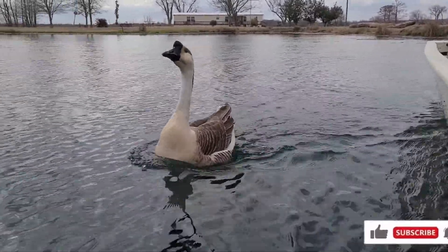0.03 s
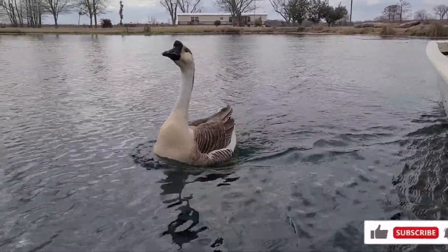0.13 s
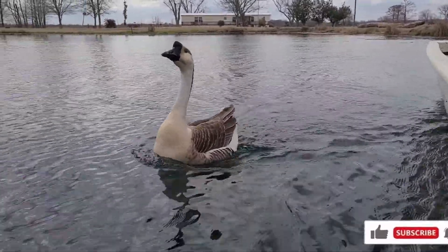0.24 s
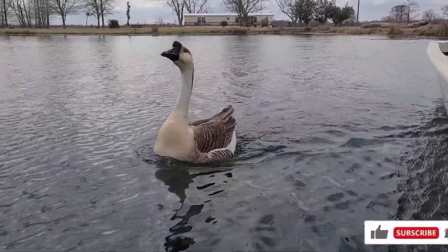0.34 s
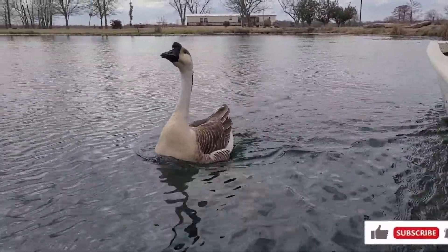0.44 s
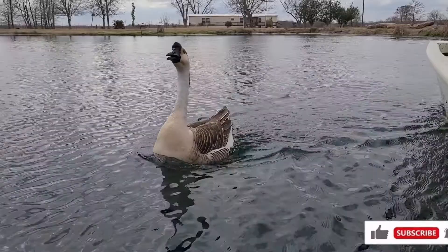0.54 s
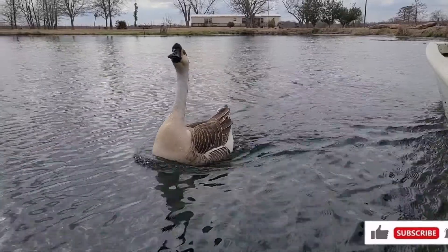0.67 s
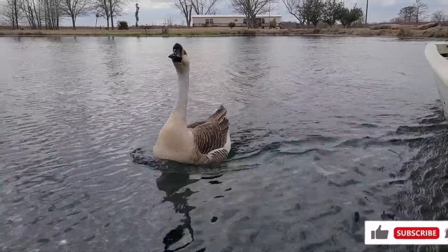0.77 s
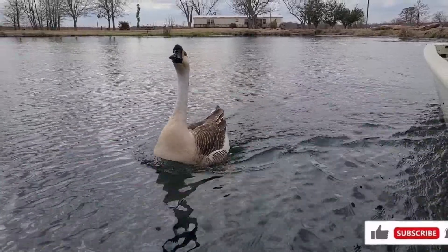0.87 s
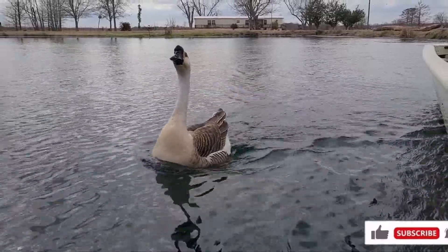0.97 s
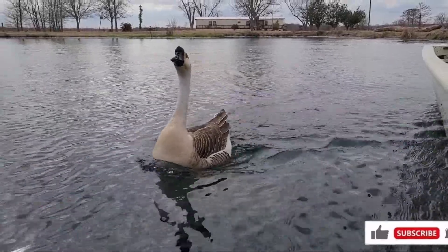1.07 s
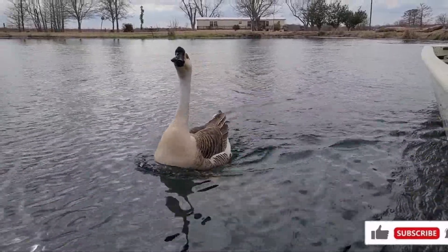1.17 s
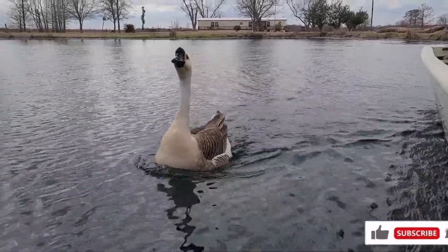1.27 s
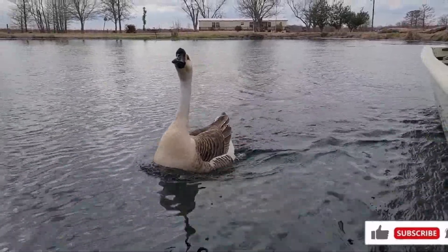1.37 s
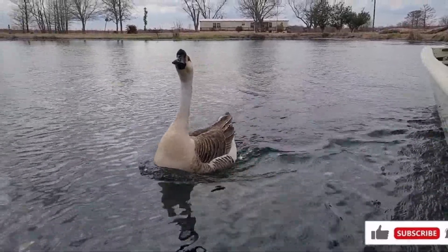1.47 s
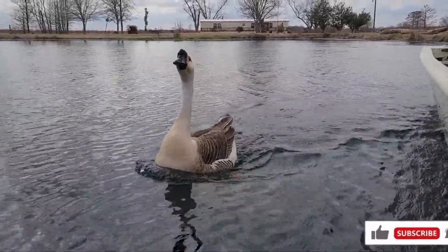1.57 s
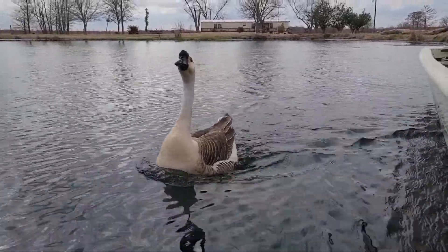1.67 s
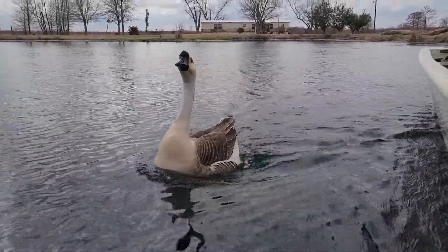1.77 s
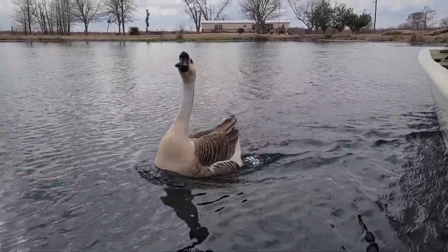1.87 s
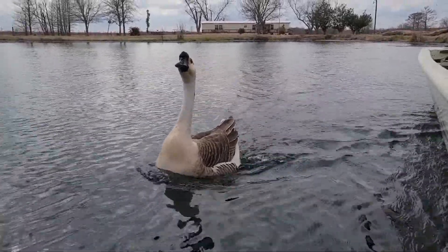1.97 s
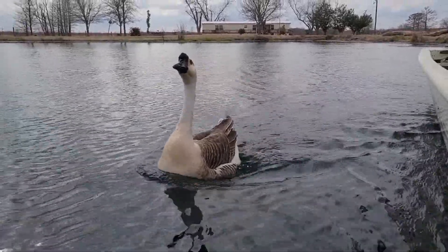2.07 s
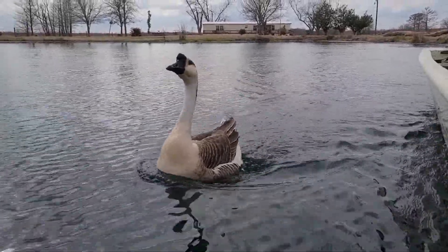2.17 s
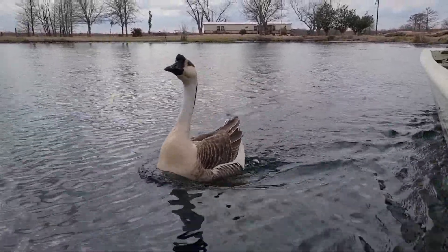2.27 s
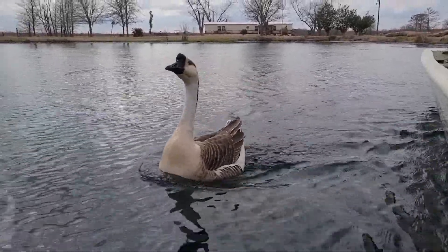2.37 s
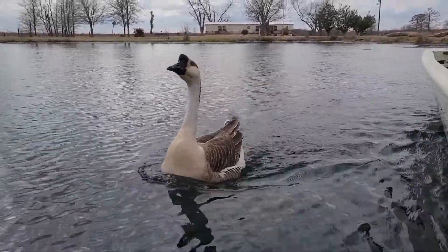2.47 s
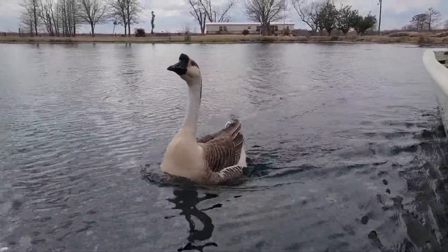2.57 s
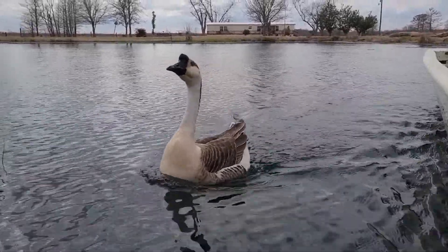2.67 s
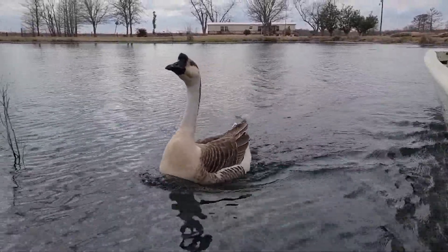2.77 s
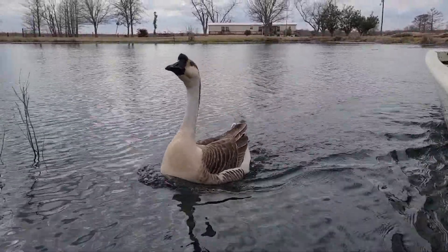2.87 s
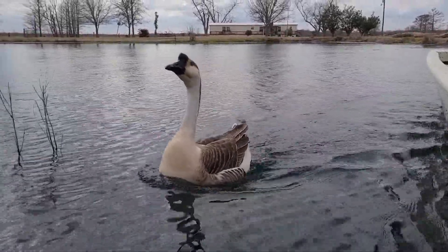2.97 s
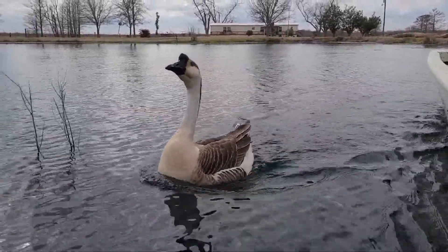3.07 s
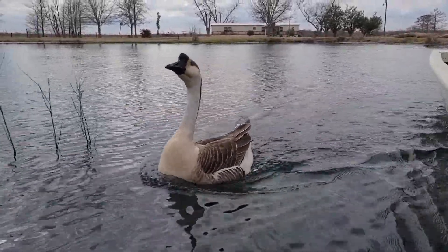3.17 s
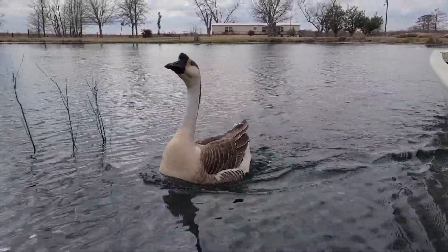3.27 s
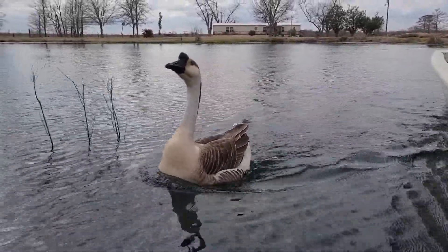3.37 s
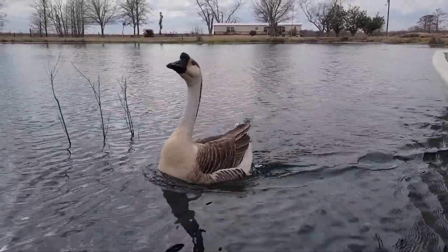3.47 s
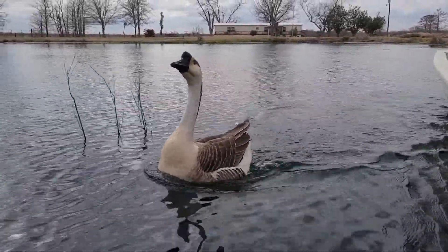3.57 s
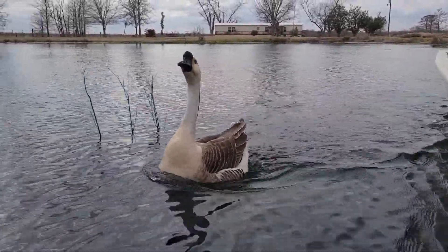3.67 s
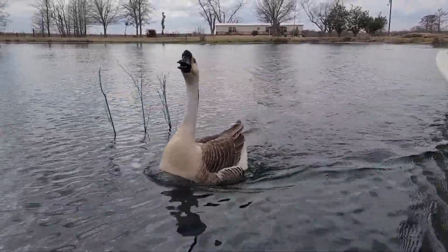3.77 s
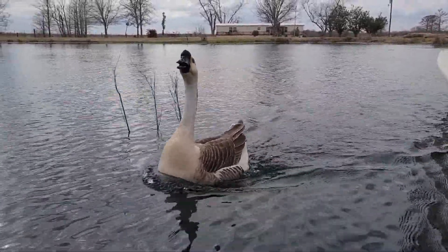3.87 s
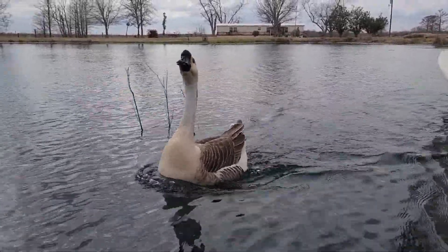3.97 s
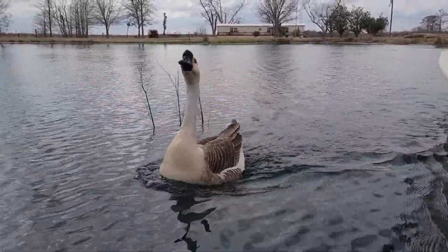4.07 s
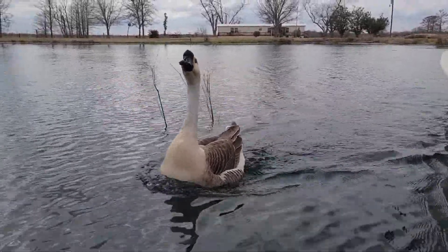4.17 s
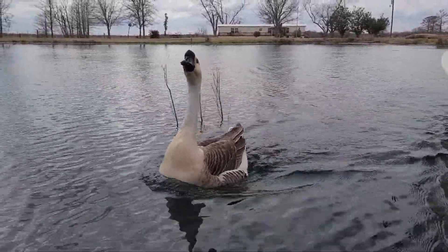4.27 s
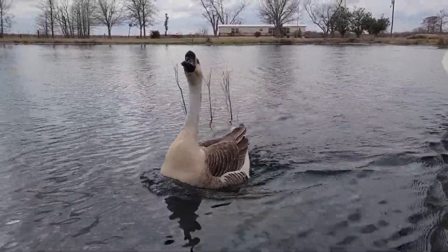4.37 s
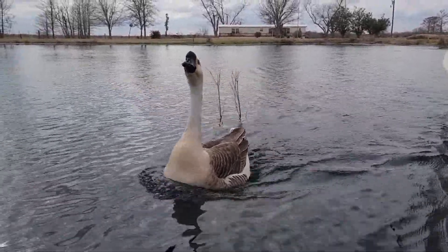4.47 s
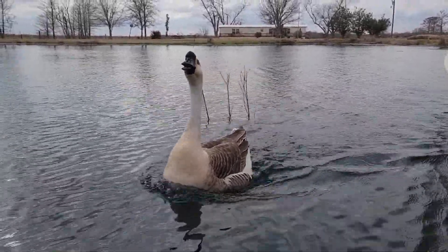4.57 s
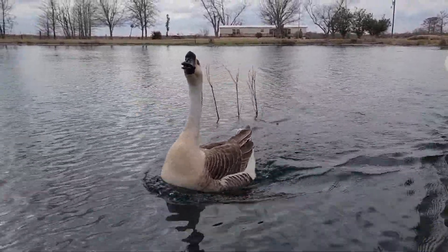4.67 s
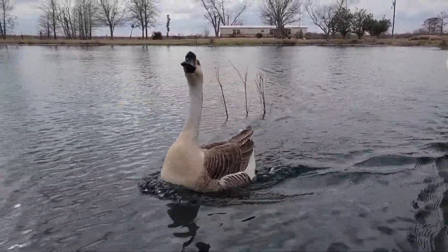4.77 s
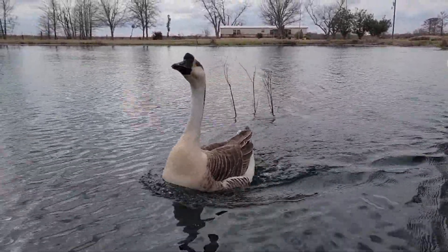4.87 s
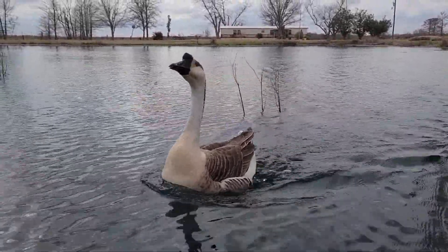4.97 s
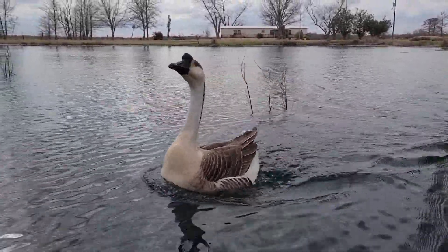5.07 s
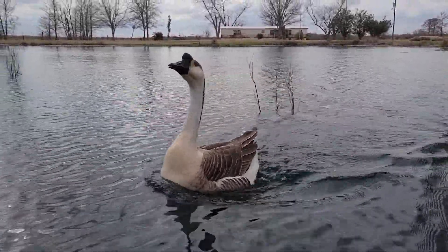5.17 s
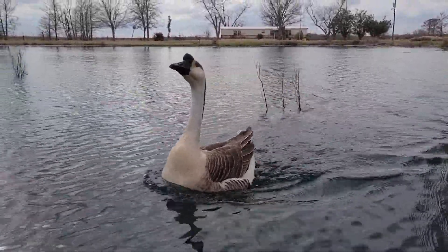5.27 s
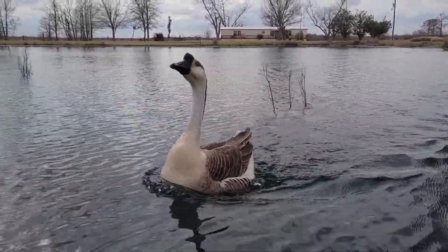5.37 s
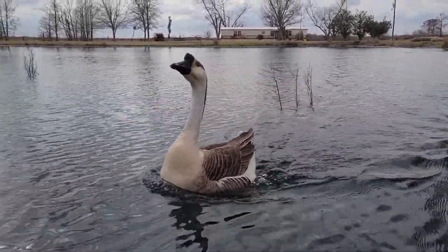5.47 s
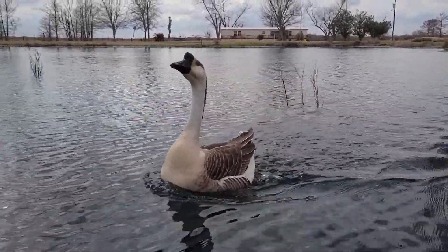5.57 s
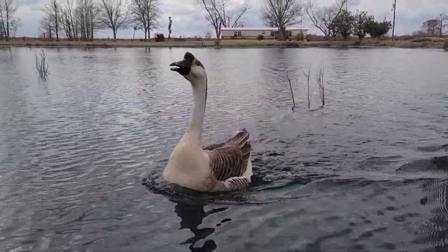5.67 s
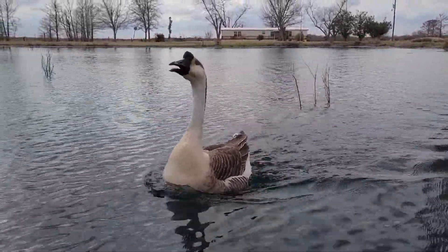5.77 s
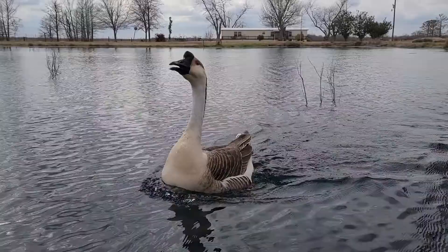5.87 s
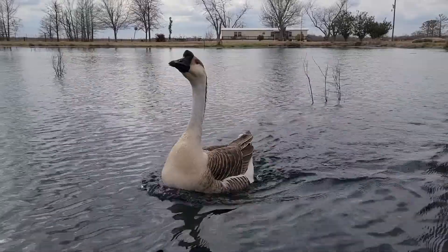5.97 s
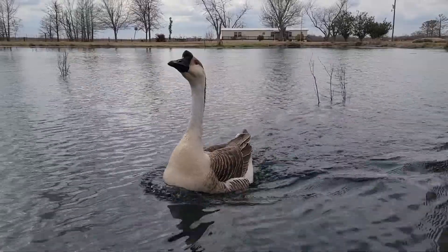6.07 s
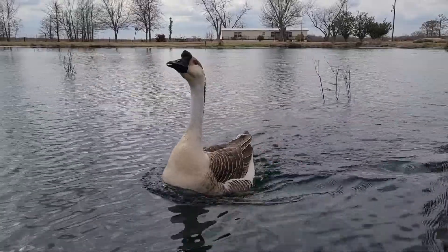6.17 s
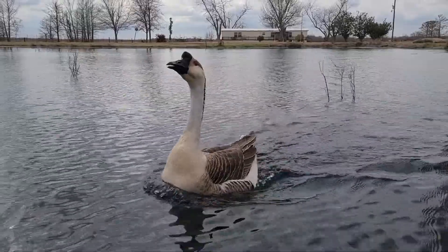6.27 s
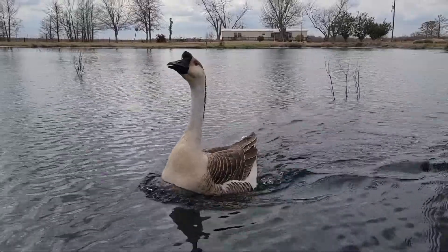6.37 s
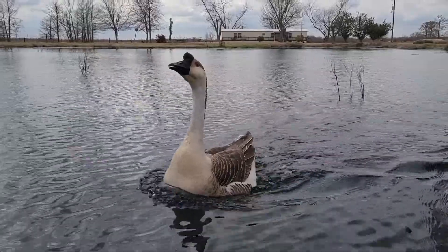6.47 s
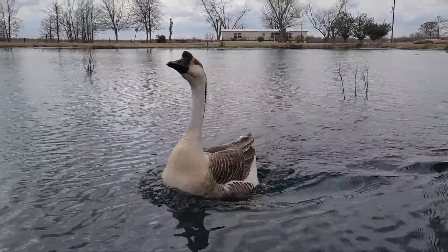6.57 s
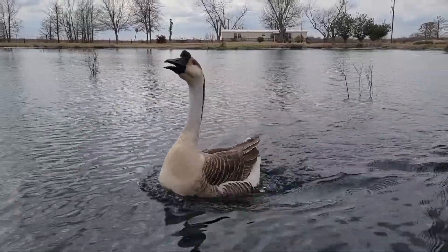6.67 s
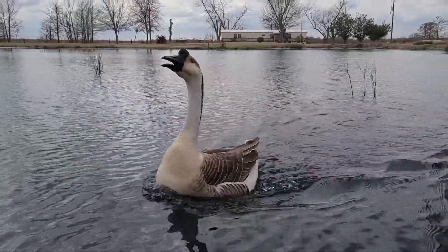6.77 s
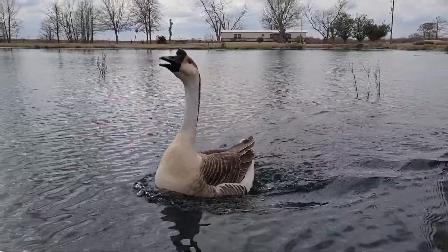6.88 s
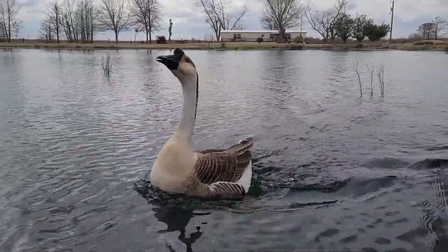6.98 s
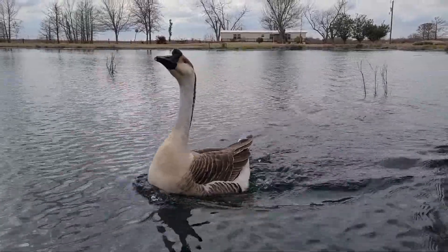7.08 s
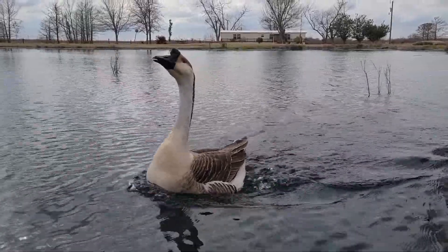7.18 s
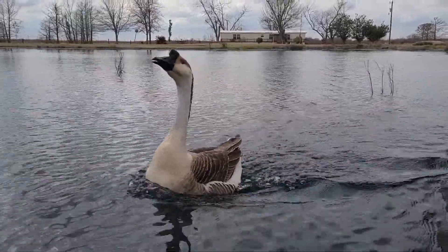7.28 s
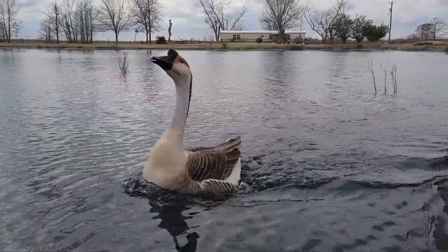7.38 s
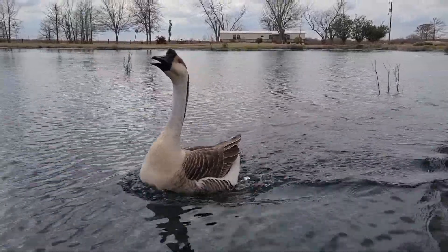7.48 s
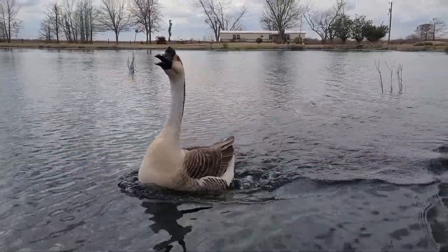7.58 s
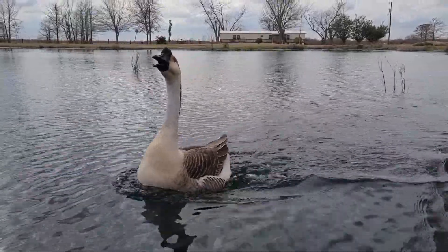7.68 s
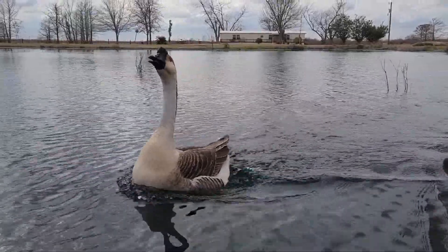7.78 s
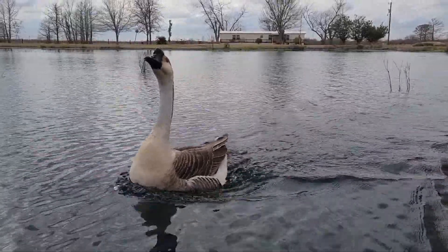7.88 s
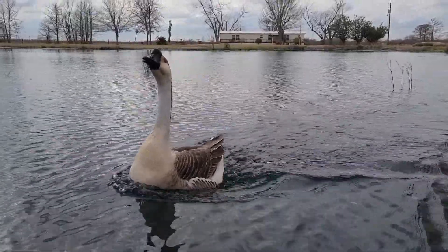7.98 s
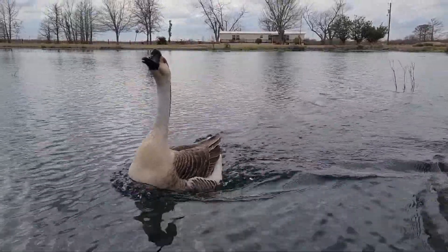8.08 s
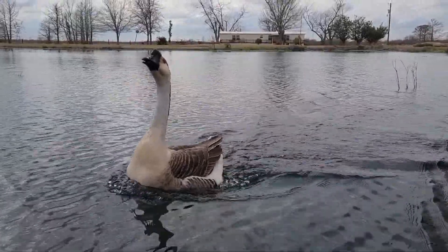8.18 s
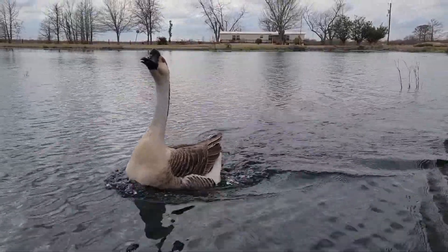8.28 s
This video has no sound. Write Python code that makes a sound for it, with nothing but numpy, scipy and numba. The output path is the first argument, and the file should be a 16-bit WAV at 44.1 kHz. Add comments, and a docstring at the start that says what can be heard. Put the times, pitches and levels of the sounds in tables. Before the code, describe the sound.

A goose close by gives nine harsh, nasal honks over open water, with soft wind buffets, lapping, drips, faint birds and a low engine putter.

```python
"""A goose honks close to a slow boat on a pond: a whistle near 1.2 kHz, chopped by a slow uneven buzz
that also drives windpipe and beak resonances; each honk follows its own effort curve.
Behind it the engine putters (pulses through exhaust resonances), wind buffets two microphone ports (shaped
noise), water laps (grains and hiss) and drips (rising tones and spray), and bank birds trill (swept sines)."""
import sys
import numpy as np
from scipy import signal
from scipy.fft import rfft, irfft, next_fast_len
from scipy.io import wavfile
from scipy.ndimage import uniform_filter1d
from numba import njit

SR = 44100
rng = np.random.default_rng(int(sys.argv[2]) if len(sys.argv) > 2 else 0)


def wav_record(signal):
    """Record a signal, one row per channel, as 16-bit PCM in the file named by sys.argv[1]."""
    frames = np.transpose(np.atleast_2d(signal))
    bounded = np.clip(frames, -1, 1)
    # unit amplitude maps onto the largest positive 16-bit level
    quanta = np.round(bounded * 32767).astype(np.int16)
    wavfile.write(sys.argv[1], SR, quanta)


N = 367353

# Windpipe, then beak, each with the beak open and shut. Each row: centre in Hz before neck motion,
# width in Hz, relative dB.
WINDPIPE_MODES = [
    [(762, 8.8, 9), (1030, 490, -0.5), (1189, 350, -0.5), (1311, 71, 5), (1596, 160, 0.5)],
    [(802.9, 35, 7), (1009, 106, -7.5), (1168, 38, -3), (1311.3, 150, 6), (1335, 182, 4)],
]
BEAK_MODES = [
    [(2090, 190, 0), (2276, 95, 4.5), (2495, 15, 8.5), (2945, 160, 2), (3337, 31, 2), (3800, 49, 2),
     (4333, 200, -2.5), (4840, 100, 0), (5530, 55, -9), (6310, 330, -2.5)],
    [(1820, 79, 0), (2330, 163, -3), (2657, 41, 3), (2957, 40, 2.5), (3400, 127, -15), (3824, 67, -3.5),
     (4320, 146, -2.5), (4680, 100, -6.5), (5220, 380, -19), (6280, 190, -16.5)],
]
# Low windpipe mode, open and shut. Each row: centre in Hz, width in Hz, relative dB.
LOW_PIPE_MODES = [(479.6, 26, 0), (479, 80, 0)]
# Breath hiss; the first row is the hiss, the rest its top. Each row: centre in Hz, width in Hz, relative dB.
HISS_MODES = [(5440, 2900, 1), (9050, 2700, -28.5), (9930, 680, 19.5), (14500, 11000, 10.5)]
# Whistle overtones. Each row: multiple of the whistle, relative dB.
WHISTLE_OVERTONES = [(2, 8), (3, 4), (4, 0), (5, 6.5), (6, -4), (7, -45)]
# Narrow gaps in the honk's spectrum, for open and shut beak. Each row: centre in Hz, width in Hz.
VOICE_GAPS = [
    [(1850, 26), (3100, 320), (4620, 29)],
    [(1760, 35), (3510, 55), (5900, 66)],
]
# Buzz through each long honk. Each row: time in seconds, pitch in Hz before jitter.
LONG_BUZZ_HZ = [
    [(0.9, 123.2), (0.954, 140.2), (0.99, 147.1), (1.078, 144.8), (1.276, 144.6), (1.292, 148.6),
     (1.316, 144.5), (1.35, 145.5), (1.368, 142.4), (1.388, 144.2), (1.4, 144)],
    [(2.46, 129.7), (2.496, 131.6), (2.528, 141), (2.592, 144.3), (2.798, 145.9), (2.828, 142.9),
     (3.014, 145.3), (3.048, 159.2), (3.07, 150.6), (3.11, 143), (3.14, 140.7)],
]
LOCKED_MULTIPLE = 8   # shut beak: whistle locked to this multiple of the buzz, before the 0.99 trim
MOUTH_WIDTH_HZ = 283
NECK_SAG, NECK_WANDER = 0.028, 0.02   # share by which resonances sink over a honk, and wander
SHUT_STEADIES = 0.35   # share of jitter and breath lost behind a shut beak
PULSE_SLIP_S = 6e-5   # spread of pulse timing
RASP_DB, RASP_PER_S = 4.5, 130   # flutter of the beak resonances
FLICKER_DB = 4   # hiss and its top each flicker on their own
PORT_GAIN_DB = 2.5


def goose(jitter, shimmer_db, breath, chop, wobble, scatter, restless_db):
    """Whistle and buzz share windpipe and beak; the whistle steadies as its share grows."""
    (level_db, whistle_hz, buzz_hz, share, low_db, bright_db, hiss_db, chest_db, top_db,
     bend, shut, pan_db, along) = in_time(np.vstack(honk_controls()))
    share, shut = np.clip(share, 0, 1), (shut > .5).astype(int)
    buzz_hz = np.where(shut, in_time(np.vstack(LONG_BUZZ_HZ))[0], buzz_hz)
    neck = 1 + NECK_SAG * (1 - shut) * (.5 - along) + NECK_WANDER * drift(4.65)

    steadied = 1 - SHUT_STEADIES * shut
    buzzing_hz = buzz_hz * (1 + jitter * steadied * drift(60))
    turns = np.cumsum(buzzing_hz) / SR
    slip = PULSE_SLIP_S * buzzing_hz * rng.standard_normal(4000)[(turns + .5).astype(int)]
    cycle = np.maximum.accumulate(turns + slip).astype(int)
    shimmer = amp(shimmer_db * rng.standard_normal(4000)[cycle])
    pulses = rms_one(np.diff(cycle, prepend=0) * shimmer)
    swing = np.cos(2 * np.pi * turns)
    air = rms_one((1 + 0.021 * swing) * rng.standard_normal(N))   # slight puff every buzz cycle
    buzz = pulses + breath * steadied * air

    free_hz = whistle_hz * (1 + wobble * (1.05 - share) * drift(97.8))
    wavering_hz = np.where(shut, LOCKED_MULTIPLE * buzzing_hz, free_hz)
    chopped = 1 + chop * (1.12 - share) * swing   # side lines around the whistle
    whistle = chopped * partials(wavering_hz * (1 - 0.18 * bend * swing), [(0.99, 0)])
    upper = (1 + 0.38 * swing) * partials(wavering_hz * (1 - bend * swing), WHISTLE_OVERTONES)

    pipe_neck = 1 + 0.51 * (neck - 1)
    pipe = np.choose(shut, [resonate(buzz, m, restless_db, pipe_neck) for m in WINDPIPE_MODES])
    pipe = moving_resonance(pipe, whistle_hz, MOUTH_WIDTH_HZ, SR)
    beak = np.choose(shut, [resonate(buzz, m, RASP_DB, neck, RASP_PER_S) for m in BEAK_MODES])
    hiss = resonate(0.36 * pulses + air, HISS_MODES[:1])
    top = resonate(0.3 * pulses + air, HISS_MODES[1:])
    low = np.choose(shut, [resonate(resonate(buzz, [m]), [m]) for m in LOW_PIPE_MODES])

    layers = (whistle, upper, pipe, beak, hiss, top, low)
    whistle, upper, pipe, beak, hiss, top, low = (even(x, 0.021) for x in layers)
    voice = np.sqrt(share) * whistle + np.sqrt(1 - share) * pipe
    voice += amp(low_db - PORT_GAIN_DB) * low
    voice += amp(hiss_db + FLICKER_DB * drift(4.0)) * hiss
    upper_part = share ** 2 * amp(2.2 * drift(20)) * upper
    voice += amp(bright_db) * (upper_part + np.sqrt(1 - .93 * share ** 2) * beak)
    voice += amp(top_db + FLICKER_DB * drift(23)) * top
    voice = np.choose(shut, [notched(voice, gaps) for gaps in VOICE_GAPS])

    chest = np.sqrt(2) * partials(np.minimum(buzz_hz, 155), [(0.99, 0.0018)])
    calling = sounding(honk_controls(), 0.0077)
    heard = to_ports(calling * amp(level_db) * voice + low_voice(), scatter)
    return heard * amp([pan_db / 2, -pan_db / 2]) + calling * amp(chest_db) * chest


# Honks. Each row: start in seconds, hold in seconds, tail in seconds, dB added to the effort level,
# fall of the voice under the chest tone in dB before CHEST_FOLLOWS,
# whistle in Hz at start, top and end of hold before wobble and a 0.99 trim,
# share of the hold where the whistle tops, buzz in Hz (long honks use LONG_BUZZ_HZ),
# whistle share 0-1 once settled, low windpipe mode in dB re level, hiss in dB re treble,
# chest tone in dB re level, drop in seconds, top of the hiss in dB re treble,
# share of buzz pitch lost over the hold, share by which each buzz cycle bends the whistle,
# settling of the rough start in seconds, left minus right in dB.
HONK_ROWS = [ (0.386, 0.13, 0.1, 9, 22, 1200, 1490, 1182, 0.77, 290, 0.527, -25.5, -11.5, -32.5, 0.021, -47.5, .06, 0.056, 0.02, -1),
             (.89, 0.41, 0.098, 0, 6.2, 1150, 1170, 1114, 0.41, 145.7, 0.27, -13, -28, -15.5, 0.031, -24, -0.013, 0.028, 0.035, 0.5),
             (2.451, 0.63, 0.091, 0, 6, 1140, 1165, 1193, 0.53, 147, 0.2, -13, -57, -12.5, 0.026, -28, -0.0015, 0.027, 0.023, 0.5),
             (3.653, 0.1414, 0.16, 12, 8.55, 1240, 1250, 1221, 0.49, 143.7, 1, -41.5, -10.5, -37, 0.033, -64, -0.025, 0.01199, .035, 0),
             (4.484, 0.12, 0.15, 5.5, 19, 1250, 1335, 1180, .55, 147.6, 0.481, -27, -6.5, -29.5, 0.061, -52, -0.015, 0.07, 0.033, 0),
             (5.603, 0.16, 0.22, 7.5, 11.7, 1190, 1285, 1227, 0.54, 146.4, 0.69, -31, -17, -31, 0.067, -20, 0.0052, 0.067, 0.041, 1.2),
             (6.562, .29, 0.2, 0.5, 15, 1180, 1280, 1191, .55, 146.3, 0.33, -30, -9.5, -27, 0.022, -44, .01, 0.036, .027, 0.5),
             (7.412, 0.26, .13, 6.5, 7.8, 1240, 1295, 1210, 0.41, 241.3, 0.99, -72.5, -3.5, -49, 0.026, -59, 0.15, 0.067, 0.027, -1),
             (8.318, .1, 0.09, 9.5, 11.55, 1430, 1430, 1430, 0.61, 144.5, 0.336, -41, -17, -47.5, .019, -19.5, 0.0055, 0.0423, .027, -1),
             ]
# Effort through each honk. Each row: time in seconds, level in dB before the honk's own dB,
# treble in dB re level before TREBLE_DB.
HONK_EFFORT = [
    [(0.388, -43.5, -10), (0.392, -39, -9), (0.42, -19, -10.5), (0.474, -23.5, -5.5), (0.498, -32, -2),
     (0.51, -23, -11.5), (0.568, -61, -10), (0.608, -53.5, -29), (0.62, -64, -25)],
    [(0.893, -71, -30), (0.901, -40, -10), (0.935, -33, -4), (1.029, -29, -8), (1.059, -34, -8),
     (1.153, -29.5, -7.5), (1.171, -35.5, -5), (1.205, -28, -8.5), (1.335, -36, -9), (1.383, -46, -7),
     (1.4, -46.5, -26)],
    [(2.455, -61, 10), (2.463, -33, -7), (2.487, -29, -6.5), (2.767, -26.5, -7.5), (2.817, -31, -5.5),
     (2.849, -28, -9), (2.903, -29, -7), (2.915, -28, -5), (3.017, -27, -8), (3.071, -31.5, -7),
     (3.096, -32, -11), (3.106, -36.5, -10), (3.14, -55, -9)],
    [(3.657, -35, -26), (3.663, -38.5, 4), (3.673, -15, -16.5), (3.725, -16.5, -7), (3.799, -26.5, -19.5),
     (3.843, -37.5, -4.5), (3.893, -42.5, -6), (3.96, -61.5, -20)],
    [(4.486, -21, -10), (4.492, -30, -6), (4.508, -15.5, -11), (4.554, -22.5, -8.5), (4.568, -17.5, -13),
     (4.604, -27.5, -4), (4.62, -28.5, -15), (4.64, -29, -15), (4.682, -49, -11), (4.696, -46.5, -20),
     (4.76, -61, -5)],
    [(5.606, -29, -12.5), (5.62, -21.5, -12), (5.672, -22, -6), (5.702, -18, -12.5), (5.712, -25, -3),
     (5.74, -16.5, -13), (5.78, -32, -9), (5.826, -31.5, -13.5), (5.918, -47.5, -19), (5.94, -53, -47),
     (5.96, -67, -20.5)],
    [(6.563, -17, -20.5), (6.569, -18.5, -10.5), (6.619, -17.5, -6), (6.673, -15.5, -6.5),
     (6.683, -19.5, -9), (6.733, -11, -11.5), (6.847, -22, -16.5), (6.875, -29.5, -9), (6.995, -49, -25),
     (7.009, -41, -30), (7.03, -67.5, -3)],
    [(7.413, -38.5, 18.5), (7.421, -28, -10), (7.435, -8.5, -11.5), (7.627, -16.5, -18),
     (7.697, -31.5, -14), (7.705, -36.5, -5), (7.755, -49.5, 2), (7.805, -43.5, -10), (7.82, -48.5, 0)],
    [(8.319, -38.5, -5), (8.329, -36, 2)],
]
TREBLE_DB = 1
LONG_S = 0.4   # longer honks come through a nearly shut beak
ROUGH_START = 0.565   # share of the whistle missing at the start
BUZZ_START, BUZZ_RISE_S = 0.1, 0.07   # buzz starts flat by this share and climbs
TAIL_SAG_HZ_PER_S, TAIL_SHARE = 300, 0.13   # whistle sags and weakens to this share in the tail
CHEST_FOLLOWS = 0.086   # share of the drop the chest tone follows into the tail


def honk_controls():
    """Level and treble follow the effort; the whistle arches and the buzz climbs to pitch."""
    rows = []
    for honk, effort in zip(HONK_ROWS, HONK_EFFORT):
        (s, hold, tail, db, drop_db, hz0, hz1, hz2, top_at, buzz, share, low_db, hiss_db, chest_db,
         drop_s, top_db, buzz_sag, bend, settle_s, pan_db) = honk
        t = np.linspace(0, hold + tail, num=150)
        when, effort_db, effort_treble_db = np.transpose(effort)
        level_db = db + np.interp(s + t, when, effort_db)
        treble_db = TREBLE_DB + np.interp(s + t, when, effort_treble_db)
        fresh = np.exp(-(t / settle_s) ** 2)
        dropped = np.clip((t - hold) / drop_s, 0, 1)
        whistle_hz = np.interp(t, [0, top_at * hold, hold], [hz0, hz1, hz2])
        whistle_hz = whistle_hz - TAIL_SAG_HZ_PER_S * np.maximum(t - hold, 0)
        climb = BUZZ_START * np.exp(-t / BUZZ_RISE_S)
        buzz_hz = buzz * (1 - climb - buzz_sag * np.minimum(t / hold, 1) ** 2)
        part = share * (1 - ROUGH_START * fresh) - dropped ** 2 * max(share - TAIL_SHARE, 0)
        chest_level_db = level_db + chest_db + (1 - CHEST_FOLLOWS) * drop_db * dropped
        rows.append(np.transpose([
            s + t, level_db, whistle_hz, buzz_hz, part, low_db + 0 * t, treble_db,
            hiss_db + treble_db, chest_level_db, top_db + treble_db, bend + 0 * t,
            (hold > LONG_S) + 0 * t, pan_db + 0 * t, t / t[-1]]))
    return rows


# Clear low voice, mostly as honks die. Each row: start in seconds, length in seconds,
# starting pitch in Hz, swell level in dB before the partials and port gain.
LOW_VOICE_NOTES = [(0.458, 0.038, 783, -40), (0.516, 0.064, 414, -59), (3.845, 0.092, 504, -45),
                   (5.778, 0.174, 495.2, -49.5), (7.705, 0.09, 505, -46)]
# Its partials. Each row: multiple of the pitch, relative dB.
LOW_VOICE_PARTIALS = [(1, 10), (2, 18.5), (3, 4.5), (5, -29), (6, -1.5), (7, -1), (8, 0.5)]
FALL_PER_S = 1.7   # share of pitch lost
SWELL_S, SWELL_DB_PER_S = 0.024, 152.5   # swells until SWELL_S, then fades


def low_voice():
    """Some honks break into a clear falling harmonic note that swells and fades."""
    out, t = np.zeros(N), np.arange(N) / SR
    for s, length, hz, db in LOW_VOICE_NOTES:
        span = slice(round(s * SR), round((s + length) * SR))
        age = t[span] - s
        shape = signal.windows.tukey(len(age), .2) * amp(db - SWELL_DB_PER_S * np.abs(age - SWELL_S))
        out[span] += shape * partials(hz * (1 - FALL_PER_S * age), LOW_VOICE_PARTIALS)
    return out


# Bounce off the pond, left then right. Each row: delay in seconds, level in dB re direct sound.
POND_BOUNCE = [(.0021, -48), (.0026, -4.5)]
# Lead of the left port. Each row: frequency in Hz, phase in radians.
LEFT_LEAD = [(100, .05), (400, 0.051), (800, 1.723), (1250, 1.24), (2400, 4.6), (4000, 6.38), (7000, 15.93),
             (10000, 32.6), (16000, 34)]


def to_ports(x, scatter):
    """The goose reaches the left port first; each gets a water bounce; ripples shake the treble apart."""
    size = next_fast_len(N + SR // 10)
    hz = np.fft.rfftfreq(size, 1 / SR)
    path = np.array([1 + amp(db) * np.exp(-2j * np.pi * hz * s) for s, db in POND_BOUNCE])
    path[1] *= np.exp(-1j * at_hz(LEFT_LEAD, hz))
    left, right = amp(PORT_GAIN_DB) * irfft(rfft(x, size) * path, size)[:, :N]
    shaken = np.arange(N) + scatter * drift(19)   # in samples
    return np.array([left, np.interp(shaken, np.arange(N), right)])


# Engine turning. Each row: time in seconds, firings so far.
FIRING_COUNT = [(0, .57), (2.63, 36.83), (5.43, 75.98), (8.33, 116.73)]
# Exhaust resonances. Each row: centre in Hz, width in Hz, relative dB.
EXHAUST_MODES = [(258.9, 21, 8), (335.5, 26, -13.5), (582, 120, -14)]
# Engine tones. Each row: multiple of the firing rate, peak in dB re the putter's rms.
ENGINE_TONES = [(3, 3), (12, -6), (33, -14.5), (36, -5)]
PUTTER_DB = -54.5   # before the port gains


def engine():
    """One soft puff per firing rings the exhaust; a few orders stand out as tones."""
    turns = in_time(FIRING_COUNT)[0]
    firing = np.diff(turns.astype(int), prepend=0) * amp(1.2 * drift(27))
    puffs = rms_one(firing) + 0.4 * rng.standard_normal(N)
    putter = rms_one(resonate(resonate(puffs, EXHAUST_MODES), [(252, 540, 0)]))
    tones = sum(amp(db) * np.sin(2 * np.pi * k * turns) for k, db in ENGINE_TONES)
    return amp(PUTTER_DB) * (putter + tones) * amp([[-2.5], [2.2]])


# Wind level. Each row: time in seconds, level in dB before pan and lumps.
WIND_LEVEL = [(0, -60), (0.65, -48.5), (0.75, -38.5), (0.9, -68), (1.25, -44.5), (1.65, -44.5),
              (2.15, -49.5), (2.4, -36.5), (3.0, -54.5), (3.6, -55.5), (4.2, -59.5), (5.5, -52),
              (7.15, -58), (7.3, -45), (7.5, -47.5), (8.33, -59.5)]
# Wind balance. Each row: time in seconds, left minus right in dB.
WIND_BALANCE = [(0, -13), (3, -9.5), (4, 6), (8.33, 7.5)]
# Wind spectrum. Each row: frequency in Hz, relative dB per Hz.
WIND_SPECTRUM = [(12, -49.5), (20, -9), (75, 6.5), (161, -15), (264, -16), (393, -26), (491, -31.5),
                 (900, -36.5), (1170, -64.5), (1980, -120)]
# Single buffets. Each row: time in seconds, peak level in dB before pan and lumps.
BUFFETS = [(0.08, -37.5), (0.163, -34.5), (0.71, -34.5), (0.84, -31.5), (1.34, -32.5), (1.52, -39.5),
           (1.7, -31.5), (1.901, -38), (1.981, -26.5), (2.29, -35), (2.439, -32.5), (2.67, -34.5),
           (2.92, -37.5), (4.63, -35), (7.311, -35.5), (7.96, -32.5)]
BUFFET_DB_PER_S = 409.5   # rise and fall


def wind(lumpy_db):
    """Turbulence at each port: low shaped noise with its own lumps, raised by single buffets."""
    level_db, pan_db = in_time(WIND_LEVEL)[0], in_time(WIND_BALANCE)[0]
    for s, db in BUFFETS:
        level_db = np.maximum(level_db, db - BUFFET_DB_PER_S * np.abs(np.arange(N) / SR - s))
    lumps = amp(lumpy_db * np.array([drift(7.8), drift(10.0)]))
    gusts = rms_one(lumps * colour(rng.standard_normal((2, N)), WIND_SPECTRUM))
    return gusts * amp(level_db + np.array([pan_db, -pan_db]) / 2)


# Water spectrum. Each row: frequency in Hz, relative dB per Hz.
POND_SPECTRUM = [(60, -63.5), (120, -10.5), (300, -13.5), (700, -15.5), (1000, -23.5), (1330, -20.5),
                 (2300, -30), (3320, -25.5), (5300, -36.5), (6500, -45.5), (9500, -34), (11000, -38.5),
                 (16000, -68.5)]
POND_DB = -57   # before the port gains
STEADY_ABOVE_HZ = 5500


def pond(per_s, spread_db, hiss, patchy_db):
    """Tiny uneven splashes over hiss, unrelated at the ports; bands below the steady top come and go."""
    born = rng.random((2, N)) < per_s * amp(5 * drift(6)) / SR
    size_db = spread_db * np.minimum(rng.exponential(1, born.sum()), 5)
    grains = np.zeros((2, N))
    grains[born] = amp(size_db) * rng.choice([-1, 1], born.sum())
    lapping = colour(rms_one(grains) + hiss * rng.standard_normal((2, N)), POND_SPECTRUM)
    edges = np.geomspace(60, 17000, num=13)
    water = 0
    for band in zip(edges, edges[1:]):
        patches = amp(patchy_db * (band[0] < STEADY_ABOVE_HZ) * drift(13.0))
        water = water + patches * bandpass(lapping, band)
    return amp(POND_DB) * rms_one(water) * amp([[-2.5], [2.2]])


# Drips and splashes. Each row: time in seconds, level in dB before mix and port gains, starting pitch in Hz.
DRIP_ROWS = [(0.073, -77, 690), (0.367, -46, 670), (0.598, -55, 2500), (0.705, -49, 2300),
             (0.815, -52, 2930), (0.749, -49, 726), (1.453, -43, 2950), (1.549, -69, 672),
             (1.627, -52.5, 1210), (1.757, -47, 670), (2.061, -50.5, 2550), (2.113, -47, 674),
             (2.262, -50.5, 3900), (2.311, -49, 3450), (2.394, -52, 1671), (2.42, -63.5, 723.1),
             (3.205, -58, 5508), (3.24, -61, 5400), (3.275, -54, 1600), (3.51, -45, 1333),
             (4.3, -68.5, 2976), (4.418, -52, 1520), (4.787, -48, 737.7), (4.875, -61, 4523),
             (4.985, -74, 1300), (5.02, -79, 2210), (5.03, -48, 648), (5.14, -74.5, 2687),
             (5.147, -69, 4870), (5.205, -71, 1140), (5.272, -64, 2300), (5.34, -62, 1900),
             (5.46, -72, 4300), (5.475, -51.5, 1310), (5.505, -54, 1203), (5.567, -55.5, 4000),
             (6.003, -56.5, 2586), (6.281, -56, 3807), (6.45, -55, 1292), (7.246, -61, 3304),
             (7.289, -56, 1450), (8.138, -47.5, 2125), (8.25, -48.5, 2832)]
DRIP_T60_S, DRIP_CYCLES = 0.022, 130   # 60 dB decay: the shorter of this time and this many cycles
# small random droplets scattered throughout
DROPLETS_PER_S, DROPLET_DB, DROPLET_SPREAD_DB, DROPLET_CAP_DB = 22, -70, 4, 6


def drips(splash):
    """A bubble rings with rising pitch under a short spray of noise."""
    out, t = np.zeros(N + SR), np.arange(SR // 5) / SR
    rows = list(DRIP_ROWS)
    for u, v, w in rng.random((round(DROPLETS_PER_S * N / SR), 3)):
        extra_db = min(-DROPLET_SPREAD_DB * np.log(v), DROPLET_CAP_DB)
        rows.append((u * N / SR, DROPLET_DB + extra_db, 1200 * 3.5 ** w))
    for s, db, hz in rows:
        spray = rms_one(bandpass(rng.standard_normal(len(t)), [hz, 1.85 * hz]))
        fade = amp(db - 60 * t / min(DRIP_T60_S, DRIP_CYCLES / hz)) * np.minimum(t / 0.0012, 1)
        bubble = np.sin(2 * np.pi * hz * t * (1 + 2.0 * t))
        out[round(s * SR):][:len(t)] += fade * (1.3 * bubble + splash * spray)
    return np.array([1.3 * out[6:N + 6], 4.0 * out[:N]])   # left leads by 6 samples


# Bank birds, one row a note. Each row: start in seconds, length in seconds, start and end pitch in Hz
# before a 0.98 trim, starting level in dB before port gains, change over the note in dB, trill beats per second,
# trill sweep as a share of pitch either way.
BIRD_NOTES = [ (0.065, 0.16, 4170, 3920, -69, -18.5, 95, 0.077),
              (0.176, 0.29, 4640, 4670, -66.5, -11, 52, 0.053),
              (1.667, 0.16, 4440, 4240, -71.5, 2.5, 94, 0.048),
              (1.803, 0.075, 4260, 3850, -67.5, -9.5, 128, 0.014),
              (1.66, 0.12, 3380, 3000, -75, 1, 120, 0.034), (3.154, 0.058, 3300, 3030, -68, 0, 45, 0.022),
              (3.237, 0.207, 3250, 3200, -74.5, -4, 70, 0.08),
              (3.236, 0.32, 4850, 5240, -77.5, 0, 150, 0.057),
              (3.255, 0.056, 5200, 4400, -83, -4, 60, 0.012), (3.436, 0.083, 4210, 3020, -72, 3, 60, 0.02),
              (4.15, 0.13, 2050, 2010, -74.5, -11.5, 35, 0.0051),
              (4.699, 0.115, 3260, 3290, -67, -7, 83, 0.073), (6.06, 0.36, 3347, 3260, -77.5, -8, 58, 0.06),
              (6.177, 0.338, 5024, 5040, -105.5, 29, 39, 0.058),
              (7.847, 0.32, 6570, 6250, -71, -18.5, 60, 0.0415),
              (7.85, 0.26, 4750, 4710, -64.5, -16.5, 97, 0.045), ]


def birds(rough):
    """Far notes, frayed by the air; each trill beat is a quick fall in pitch that swells and fades."""
    out, waver = np.zeros(N), rough * drift(486)
    frayed = amp(2.5 * drift(70))
    for s, length, hz0, hz1, db, change_db, trill, sweep in BIRD_NOTES:
        at = np.arange(round(s * SR), round((s + length) * SR))
        along = np.linspace(0, 1, len(at))
        beat = trill * length * along % 1
        swell = 1 - np.clip(9 * sweep, 0, 0.6) * np.cos(2 * np.pi * beat)
        pitch_hz = (hz0 + (hz1 - hz0) * along) * (1 + sweep * (1 - 2 * beat + waver[at]))
        tone = rms_one(swell * partials(pitch_hz, [(0.98, 0)]))
        out[at] += signal.windows.tukey(len(at), .15) * amp(db + change_db * along) * tone
    return frayed * np.array([2.0 * out, 8.15 * np.roll(out, shift=22)])   # right lags by 22 samples


def amp(db):
    """dB to gain."""
    return 10 ** (np.asarray(db) / 20)


def rms_one(x):
    """Scale so that the mean of the channels has rms 1."""
    return x / np.sqrt(np.mean(np.atleast_2d(x).mean(axis=0) ** 2) + 1e-20)


def in_time(rows):
    """Columns of a curve table at every sample."""
    s, *columns = np.transpose(rows)
    return [np.interp(np.arange(N) / SR, s, c) for c in columns]


def sounding(tables, edge_s):
    """1 inside each call, 0 between, with short ramps."""
    t = np.arange(N) / SR
    return sum(np.clip(np.minimum(t - rows[0][0], rows[-1][0] + edge_s - t) / edge_s, 0, 1)
               for rows in tables)


def at_hz(points, hz):
    """Read a (Hz, value) table on a log axis."""
    table_hz, values = np.transpose(points)
    return np.interp(np.log(hz + 1e-9), np.log(table_hz), values)


def drift(rate_hz):
    """Slow chance of rms 1: noise twice through a one-pole low-pass."""
    r = np.exp(-2 * np.pi * rate_hz / SR)
    return rms_one(signal.lfilter([1], [1, -2 * r, r * r], rng.standard_normal(N + SR))[SR:])


def partials(pitch_hz, table):
    """Sines on multiples of a moving pitch."""
    phase = 2 * np.pi * np.cumsum(pitch_hz) / SR
    return sum(amp(db) * np.sin(k * phase) for k, db in table)


@njit
def moving_resonance(x, hz, width, rate):
    """One resonance whose centre follows hz, gain near 1 on top."""
    r, out = np.exp(-np.pi * width / rate), np.zeros(len(x))
    for i in range(2, len(x)):
        drive = (1 - r * r) / 2 * (x[i] - x[i - 2])
        out[i] = drive + 2 * r * np.cos(2 * np.pi * hz[i] / rate) * out[i - 1] - r * r * out[i - 2]
    return out


def resonate(x, modes, restless_db=0, stretch=None, per_s=30):
    """Parallel resonances of alternating sign; each may vary in level, and all may slide together."""
    out, stretch = 0, np.ones(N) if stretch is None else stretch
    for k, (hz, width, db) in enumerate(modes):
        if restless_db:
            steps_db = restless_db * rng.standard_normal(1500)
            db = db + np.interp(np.arange(N) / SR * per_s, np.arange(1500), steps_db)
        out = out + (-1) ** k * amp(db) * moving_resonance(x, hz * stretch, float(width), SR)
    return out


def bandpass(x, band_hz):
    """Keep one band."""
    return signal.sosfilt(signal.butter(2, band_hz, "band", fs=SR, output="sos"), x)


def notched(x, gaps):
    """Cancel narrow bands."""
    for hz, width in gaps:
        x = signal.lfilter(*signal.iirnotch(hz, hz / width, SR), x)
    return x


def colour(x, spectrum):
    """Shape noise to a spectrum in dB per Hz, at rms 1."""
    size = next_fast_len(N)
    gain = amp(at_hz(spectrum, np.fft.rfftfreq(size, 1 / SR)))
    return rms_one(irfft(rfft(x, size) * gain, size)[:, :N])


def even(x, span_s):
    """Divide out slow level changes."""
    return x / np.sqrt(uniform_filter1d(x ** 2, round(span_s * SR)) + 1e-12)


def scene():
    """Goose, engine, wind, water, drips and birds."""
    voice = goose(jitter=.022, shimmer_db=2.2, breath=.52, chop=.95, wobble=.014, scatter=.9,
                  restless_db=2.5)
    water = pond(per_s=900, spread_db=2.0, hiss=0.93, patchy_db=1.8)
    return voice + engine() + wind(lumpy_db=6.0) + water + drips(splash=0.43) + birds(rough=1.6)


LIMIT_DB, SQUEEZE = -19, 0.69   # threshold, and share of the excess taken off
GRIP_S, RECOVER_DB_PER_S = 0.0007, 16.5


def gain_control(x):
    """Loud sound pulls the gain down quickly; it recovers slowly."""
    level_db = 10 * np.log10(uniform_filter1d(np.mean(x ** 2, axis=0), size=441) + 1e-12)
    ramp = RECOVER_DB_PER_S * np.arange(N) / SR
    wanted_db = np.clip(SQUEEZE, 0, 1) * np.maximum(level_db - LIMIT_DB, 0)
    cut_db = np.maximum.accumulate(wanted_db + ramp) - ramp
    r = np.exp(-1 / (GRIP_S * SR))
    return x * amp(-signal.lfilter([1 - r], [1, -r], np.maximum(cut_db, 0)))


RIGHT_NOTCH_HZ, RIGHT_NOTCH_WIDTH_HZ, CUTOFF_HZ = 8300, 3200, 16200


def record(dry):
    """The right port has a treble dip; the gain ducks under loud sound; peaks are rounded; the top is cut."""
    right = notched(dry[1], [(RIGHT_NOTCH_HZ, RIGHT_NOTCH_WIDTH_HZ)])
    ports = gain_control(np.array([dry[0], right]))
    ports = .7 * np.tanh(ports / .7)
    return signal.sosfilt(signal.cheby2(14, 60, CUTOFF_HZ, fs=SR, output="sos"), ports)


dry = scene()
out = record(dry)
wav_record(out)
```